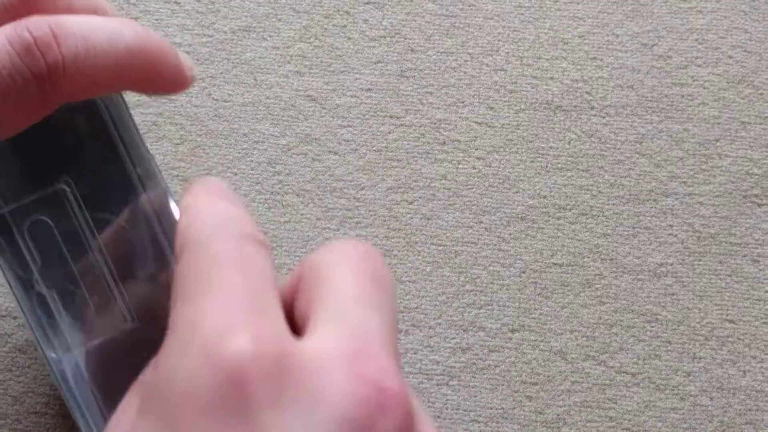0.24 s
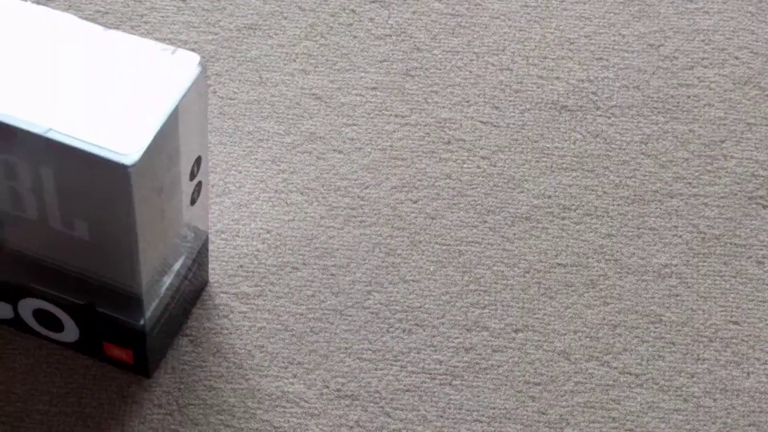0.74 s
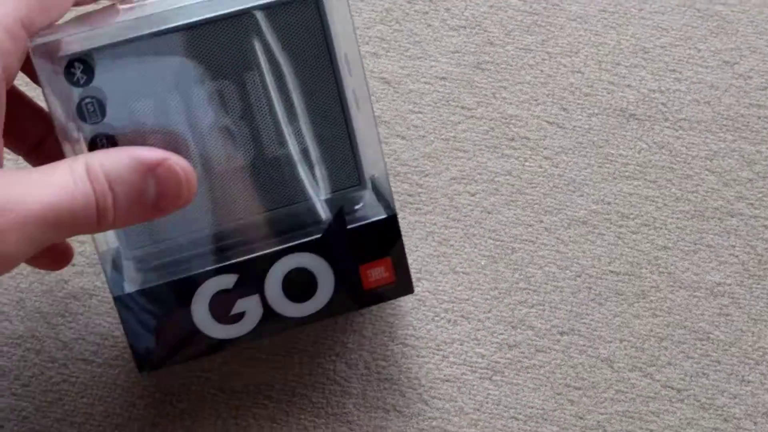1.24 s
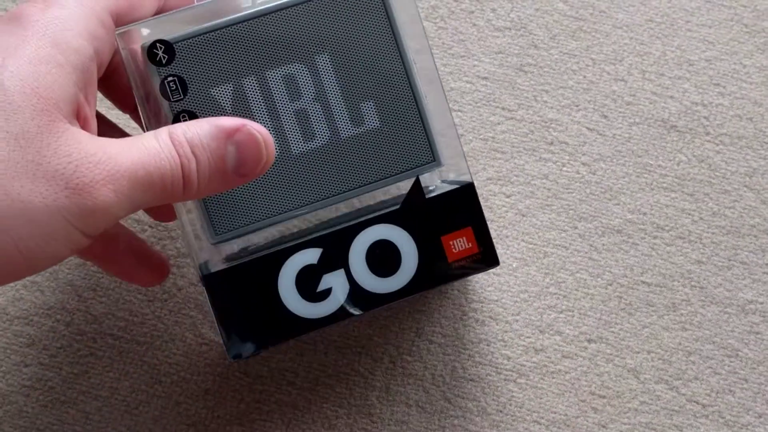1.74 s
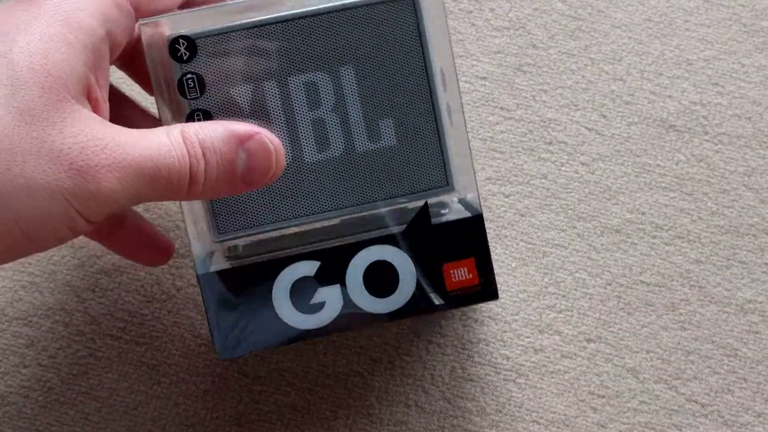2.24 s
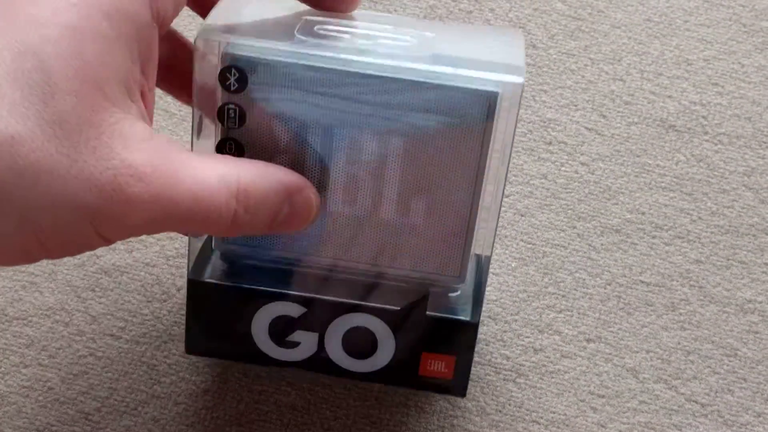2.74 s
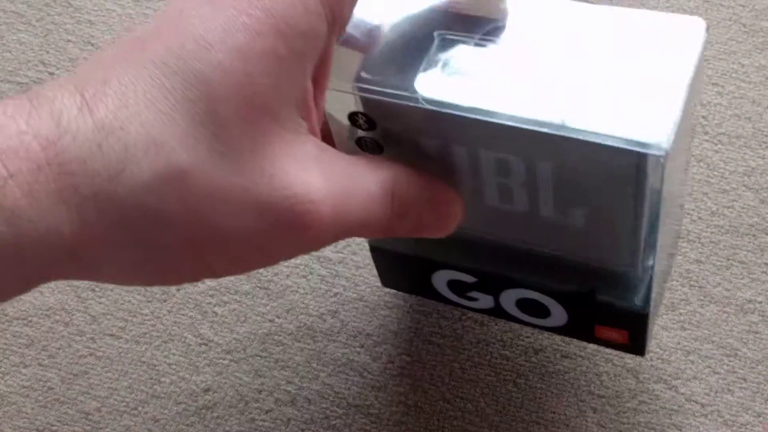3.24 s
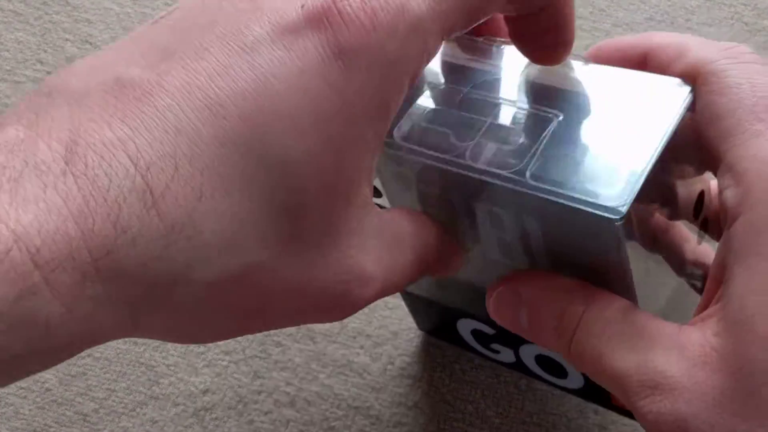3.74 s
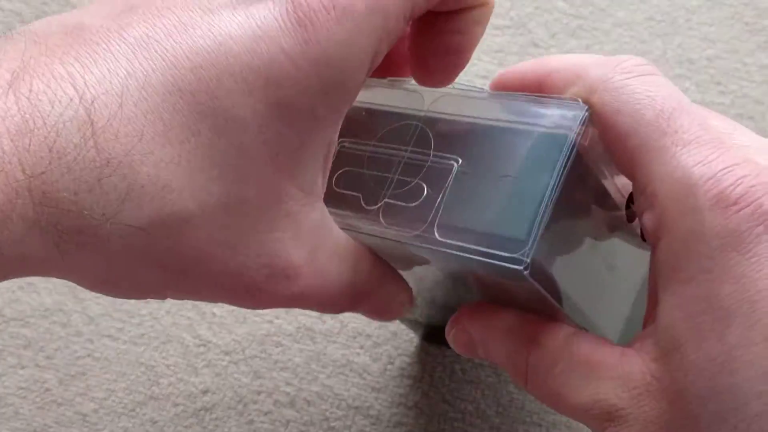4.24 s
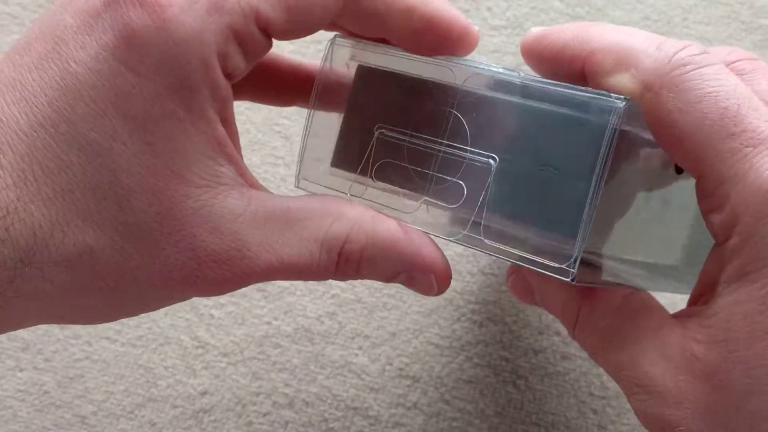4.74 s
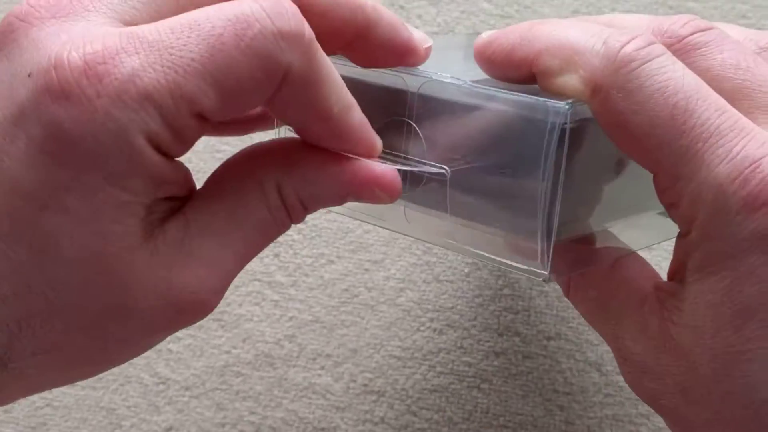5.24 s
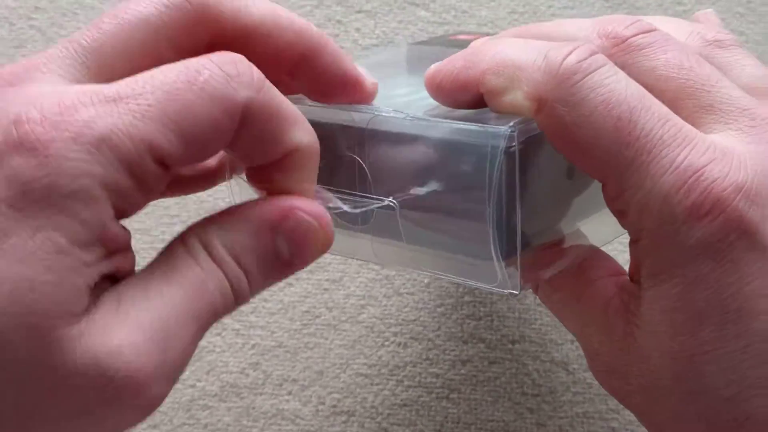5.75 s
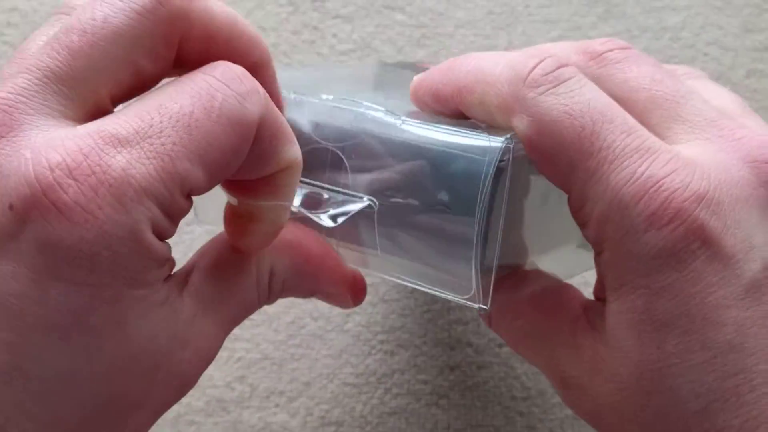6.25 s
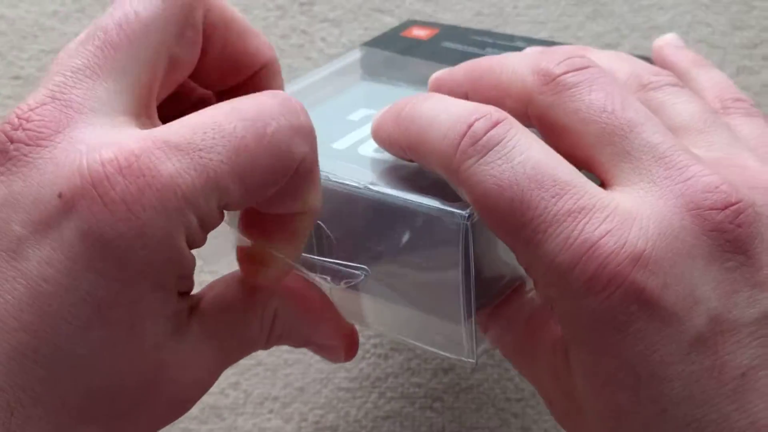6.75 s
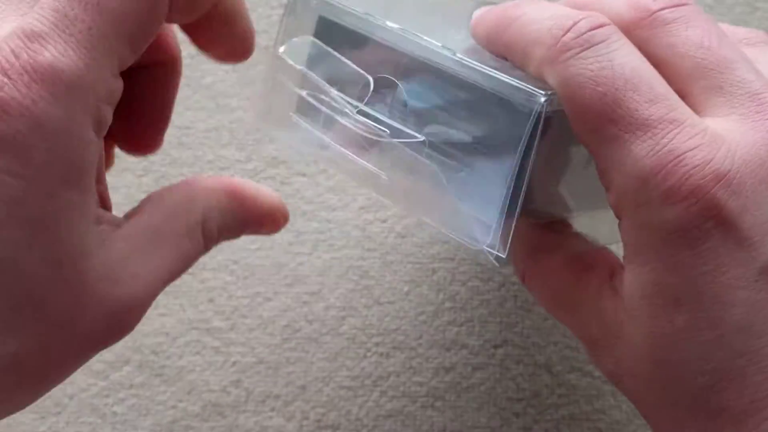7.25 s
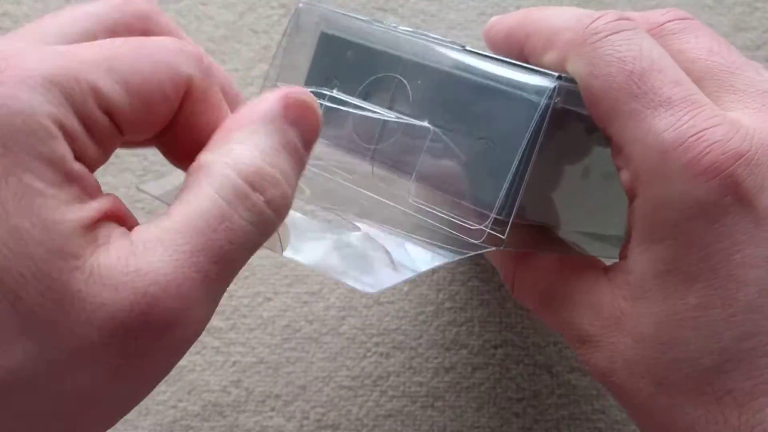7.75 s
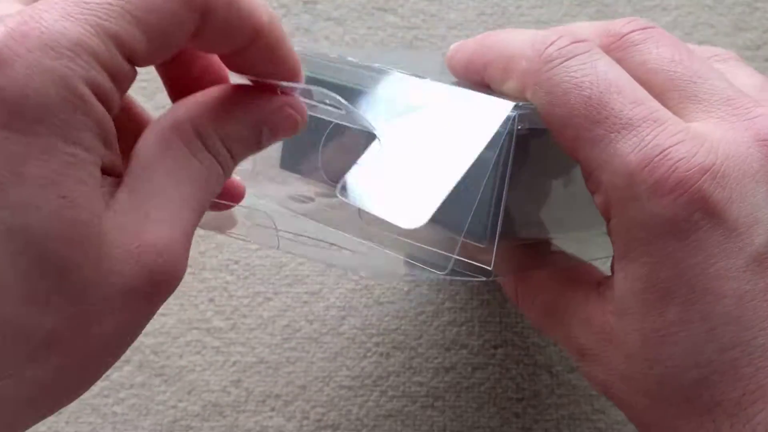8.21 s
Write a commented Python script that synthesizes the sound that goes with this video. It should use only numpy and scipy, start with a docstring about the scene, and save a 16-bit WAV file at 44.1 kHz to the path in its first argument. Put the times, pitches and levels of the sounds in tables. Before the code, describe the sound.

Hands rub, flex and pry open a stiff clear plastic box, with crinkles, small squeaks, hollow knocks and sharp snaps.

```python
"""Fingers tick and rub faintly on a stiff clear plastic box, close to the microphone, over a carpet.
The hands turn it, pick at its tab and pry the lid open, sliding in short strokes that squeak and make
the sheet crinkle. Each snap of the sheet is a bright tick that rings the panels and thumps the hollow
box; knocks ring them more softly. Two seconds in, one hard crack rings round the room; the snaps come
thickest and loudest near seven seconds."""
import sys
import numpy as np
from scipy import signal
from scipy.fft import rfft, irfft, next_fast_len
from scipy.io import wavfile
from scipy.ndimage import map_coordinates

SR = 44100
rng = np.random.default_rng(int(sys.argv[2]) if len(sys.argv) > 2 else 0)


def digitize_waveform(pressure):
    """Quantize a signal to 16-bit integers and store it at the path in sys.argv[1].

    Rows of a 2-D input are taken as channels; values are limited to [-1, 1].
    """
    field = np.atleast_2d(pressure).T
    bounded = np.clip(field, -1, 1)
    quanta = np.round(bounded * 32767).astype(np.int16)
    wavfile.write(sys.argv[1], SR, quanta)


N = 373968
SHOT = 8192  # samples in one short sound
AGE, TIME = np.arange(SHOT) / SR, np.arange(N) / SR
PRY_START_S = 5.2


def amp(db):
    """Decibels to gain."""
    return 10 ** (np.asarray(db) / 20)


def unit_rms(x):
    """Scale to rms 1."""
    return x / np.sqrt(np.mean(x ** 2) + 1e-20)


def unit_blow(x):
    """Scale a short sound to the energy of 10 ms at rms 1."""
    return x * np.sqrt(SR / 100 / (np.sum(x ** 2) + 1e-20))


def along(points, hz):
    """Read (Hz, value) points on a log frequency axis."""
    point_hz, values = np.transpose(points)
    return np.interp(np.log(hz + 1), np.log(point_hz + 1), values)


def filtered(x, response):
    """Pass x through a complex frequency response."""
    size = next_fast_len(len(x) + SHOT)
    return irfft(rfft(x, size) * response(np.fft.rfftfreq(size, 1 / SR)), size)[:len(x)]


def coloured(x, points):
    """Give x a spectrum, at rms 1."""
    return unit_rms(filtered(x, lambda hz: amp(along(points, hz))))


def causal(points):
    """Minimum-phase response of a spectrum: nothing sounds before the blow."""
    cepstrum = irfft(np.log(amp(along(points, np.fft.rfftfreq(SHOT, 1 / SR)))))
    cepstrum[1:SHOT // 2] *= 2
    cepstrum[SHOT // 2 + 1:] = 0
    return np.exp(rfft(cepstrum))


def fade(t60, attack):
    """A quick rise and an exponential decay, both set in seconds."""
    return amp(-60 * AGE / t60) * (1 - np.exp(-AGE / attack))


def burst(colour, t60, attack):
    """A dying puff of noise through a causal colour."""
    puff = rng.standard_normal(SHOT) * fade(t60, attack)
    return unit_blow(irfft(rfft(puff) * colour))


def ring(hz, t60, attack):
    """One damped mode."""
    return unit_blow(np.sin(2 * np.pi * hz * AGE) * fade(t60, attack))


def wobble(rate, size):
    """A smooth random curve, rate knots a second."""
    return map_coordinates(rng.standard_normal(int(size * rate / SR) + 4), [np.arange(size) * rate / SR])


def add(track, start_s, x):
    """Mix x into the track; what falls outside is dropped."""
    start = round(start_s * SR)
    x = x[max(-start, 0):]
    part = track[max(start, 0):][:len(x)]
    part += x[:len(part)]


# The carpeted room around the microphone. Each row: frequency in Hz, t60 in seconds.
ROOM_DECAY = [(150, 0.033), (700, 0.32), (2500, 0.28), (7000, 0.22), (11000, 0.19), (16000, 0.11)]

def room(x, build_s):
    """The room answers x with a diffuse tail that builds up and lasts longest in the midrange."""
    hz, t, noise = signal.stft(rng.standard_normal(2 * SHOT), SR, nperseg=256)
    decay = amp(-60 * t / along(ROOM_DECAY, hz)[:, None])
    tail = signal.istft(noise * decay, SR, nperseg=256)[1]
    tail *= 1 - np.exp(-(np.arange(len(tail)) / SR / build_s) ** 2)
    return signal.fftconvolve(x, tail / np.linalg.norm(tail))


# Low background noise at the microphone. Each row: frequency in Hz, relative level in dB.
RUMBLE_COLOUR = [(15, 0.5), (50, 4.5), (90, 6), (200, -3), (350, -12.5), (900, -26)]

def rumble(activity, ceiling_db=-68.5, knee_db=-70.5):
    """Low background rumble: its level rises with the sounds above it, levels off and sinks in the pauses."""
    gain = amp(ceiling_db) * activity / (activity + amp(knee_db))
    return gain * coloured(rng.standard_normal(N), RUMBLE_COLOUR)


# The whole shell. Each row: resonance in Hz, width in Hz, level in dB relative to the broad response.
SHELL_RESONANCES = [(713, 43, -6.5), (1680, 160, -9), (3830, 20, -13.5), (5320, 160, -11.5),
                    (6100, 110, -10.5), (6810, 290, -6.5), (7500, 70, -10), (8300, 160, -6.5)]

def shell(x):
    """The box lends its resonances to what happens on it."""
    def response(hz):
        return 1 + sum(amp(db) * 1j * hz * width / (centre ** 2 - hz ** 2 + 1j * hz * width)
                       for centre, width, db in SHELL_RESONANCES)
    return filtered(x, response)


# Fingers travel over the plastic. Each row: start and length in seconds, slide and rub strength in dB.
FINGER_STROKES = [(0, 0.087, -80, -70.5), (0.17, 0.054, -72, -70), (0.334, .06, -79.5, -74.5),
                  (0.401, 0.36, -65, -65), (0.814, .3, -65, -63), (0.959, 0.068, -55, -61.5),
                  (1.167, 0.11, -69, -64), (1.381, 0.067, -70, -65), (1.733, 0.036, -63, -68),
                  (1.856, 0.014, -68, -68), (1.954, 1, -71.5, -74.5), (2.15, 0.17, -62, -64.5),
                  (2.602, 0.26, -60.5, -65.5), (2.93, 0.021, -73, -67.5), (3.046, 0.868, -71.5, -72.5),
                  (3.11, 0.25, -63.5, -87), (3.306, 0.13, -74, -65.5), (3.605, 0.13, -68, -58),
                  (3.805, 0.082, -67, -63.5), (3.976, 0.026, -73, -70.5), (4.13, 0.032, -68, -61),
                  (4.21, 0.099, -70.5, -66), (4.38, 0.022, -68, -62.5), (4.457, 0.024, -64, -58),
                  (4.709, 0.019, -74, -63.5), (4.815, 0.023, -73, -66), (4.996, 0.035, -68.5, -64),
                  (5.113, 0.018, -82, -71), (5.21, 0.19, -72, -68), (5.481, 0.011, -67, -76),
                  (5.589, 0.032, -59.5, -55), (5.65, 1.26, -78.5, -65.5), (6.106, 0.018, -55.5, -63),
                  (6.76, 0.032, -53.5, -59.5), (6.993, 0.094, -42, -37), (7.42, .35, -66.5, -63),
                  (7.536, 0.12, -56.5, -65), (8.147, 0.4, -70.5, -65)]

def strokes(attack_s=0.0076, release_t60=0.26):
    """Strength of sliding and of rubbing: each stroke rises, holds and dies away, and their powers add."""
    slide_power = np.full(N, amp(-93) ** 2)  # at rest the hands only hold the box
    rub_power = np.full(N, amp(-86.5) ** 2)
    for start, length, slide_db, rub_db in FINGER_STROKES:
        t = np.arange(int((length + release_t60) * SR)) / SR
        shape = (1 - np.exp(-t / attack_s)) * amp(-60 * np.maximum(t - length, 0) / release_t60)
        add(slide_power, start, (amp(slide_db) * shape) ** 2)
        add(rub_power, start, (amp(rub_db) * shape) ** 2)
    return np.sqrt(slide_power), np.sqrt(rub_power)


def grain(per_s, spread_db):
    """Tiny slips at random moments, with a few much larger than the rest."""
    slipping = rng.random(N) < per_s / SR
    sizes = amp(spread_db * np.clip(rng.standard_normal(N), -2, 2))
    return unit_rms(slipping * sizes * rng.choice([-1, 1], N))


# Close on the fingers: sliding hiss, skin rub, the softer treble of slips, and the hollow box beneath.
# Each row: frequency in Hz, relative level in dB.
SLIDE_COLOUR = [(1000, -27), (2800, -7.5), (4500, -4.5), (6000, -2.5), (7200, 2), (8300, -6), (10000, -10),
                (15500, -15.5)]
RUB_COLOUR = [(120, -9), (280, 5), (520, -0.5), (730, 0), (1150, -3.5), (1700, -5), (2600, -8.5),
              (5000, -17.5)]
FINGERTIP_COLOUR = [(8000, -3), (11000, -5.5), (16000, -10.5)]
BOX_COLOUR = [(40, -21), (100, -15.5), (170, 1.5), (300, -3), (480, -2), (900, -35.5)]

def friction(sliding, rubbing):
    """Skin and sheet slide in fine grains; prying is grittier and makes the walls groan."""
    prying = TIME > PRY_START_S
    grit = np.where(prying, 0.58, 0.3)
    slips = grit * coloured(grain(per_s=340, spread_db=7), FINGERTIP_COLOUR)
    hiss = sliding * amp(-2 + 0.8 * wobble(33, N))
    hiss *= coloured(rng.standard_normal(N) + slips, SLIDE_COLOUR)
    rub = rubbing * amp(-4.5 + 2 * wobble(40, N))
    rub *= coloured(rng.standard_normal(N) + slips, RUB_COLOUR)
    groan = prying * rubbing * amp(-9.5 + 0.83 * wobble(28, N))
    groan *= coloured(rng.standard_normal(N), BOX_COLOUR)
    return hiss + rub + groan


# The box is jolted in the hands. Each row: start in seconds, level in dB, pitch in Hz.
JOLTS = [(3.444, -53.5, 71), (6.26, -57, 165), (6.997, -45.5, 90.7), (8.242, -52, 129)]

def bumps():
    """Dull, heavily damped thuds of the whole box."""
    out = np.zeros(N)
    for start, db, hz in JOLTS:
        add(out, start, amp(db) * ring(hz, t60=0.12, attack=0.0048))
    return out


# The sheet's tick and the panels' clatter, close up. Each row: frequency in Hz, relative level in dB.
TICK_COLOUR = [(1200, -34), (2400, -12.5), (3600, -2), (4500, -3.5), (5300, 0), (7400, 3), (8400, -4),
               (9500, -8.5), (12000, -13.5), (16000, -18)]
PANEL_COLOUR = [(250, -32.5), (560, -7.5), (800, -6), (1150, -8), (1650, -5.5), (2100, -5.5), (2600, -4.5),
                (4000, -25.5)]
# The clearest dry ticks of the flexing sheet. Each row: start in seconds, level in dB.
CLEAR_CRINKLES = [(0.4603, -57), (0.7112, -59.5), (0.873, -65), (1.547, -76), (1.7801, -72), (1.866, -67),
                  (3.863, -64), (4.1618, -61), (4.3853, -61), (4.714, -69), (5.3138, -58.5), (5.6415, -57),
                  (5.725, -61), (5.945, -62), (6.004, -61.5), (6.031, -67), (6.368, -59), (6.4928, -57),
                  (6.658, -53.5), (7.481, -60.5), (7.6715, -54), (7.724, -54)]

def crinkles(rubbing):
    """Slips too small to stir the box: a tick and some panel. More come at random as the fingers press."""
    out = np.zeros(N)
    colour = causal(TICK_COLOUR) + amp(6) * causal(PANEL_COLOUR)
    per_s = np.where(TIME < PRY_START_S, 1.5, 7)
    moments = np.flatnonzero(rng.random(N) < per_s / SR)
    # the random ones lie about 1 dB under the rubbing strength, scattered by 5 dB
    faint = [(i / SR, 20 * np.log10(rubbing[i]) - 1 - 5 * rng.standard_normal()) for i in moments]
    for start, db in CLEAR_CRINKLES + faint:
        add(out, start, amp(db) * burst(colour, t60=0.012, attack=0.00015))
    return out


# A fingertip catches. Each row: start and length in seconds, first and last pitch in Hz, level in dB.
FINGER_SQUEAKS = [(0.983, 0.025, 1572, 1440, -40.5), (0.99, 0.02, 1510, 1140, -52),
                  (1.003, 0.038, 1040, 1066, -52), (5.016, 0.015, 1440, 1360, -52.5),
                  (5.018, 0.027, 895, 724, -54.5), (6.122, 0.028, 693, 700, -49.5),
                  (6.141, 0.028, 729, 650, -49)]

def squeaks():
    """Skin sticks and slips: short, rough tones, mostly falling, with a little room behind them."""
    out = np.zeros(N)
    for start, length, first_hz, last_hz, db in FINGER_SQUEAKS:
        size = int(length * SR)
        hz = np.linspace(first_hz, last_hz, size) * (1 + 0.079 * wobble(530, size))
        grip = np.hanning(size) * amp(wobble(524, size))
        add(out, start, amp(db) * grip * np.sin(2 * np.pi * np.cumsum(hz) / SR))
    return out + amp(-13.5) * room(out, build_s=0.0034)[:N]


def tick(colour, t60, crease_hz=6100, spread_octaves=0.25):
    """A bright puff and the brief ping of the crease that made it, each time at a new pitch."""
    hz = crease_hz * 2 ** (spread_octaves * np.clip(rng.standard_normal(), -2, 2))
    puff = burst(colour, t60, attack=0.00018)
    return unit_blow(puff + amp(-9) * ring(hz, t60=0.03, attack=0.00017))


def modes(table, centre_hz, attack, scatter_db=6, focus_db_per_octave=17.5):
    """Modes far from centre_hz answer less; each blow lands on another spot and shifts their balance."""
    offsets_db = scatter_db * rng.standard_normal(len(table))
    signs = rng.choice([-1, 1], len(table))
    out = np.zeros(SHOT)
    for (hz, db, t60), offset_db, sign in zip(table, offsets_db, signs):
        loss_db = focus_db_per_octave * abs(np.log2(hz / centre_hz))
        out += sign * amp(db + offset_db - loss_db) * ring(hz, t60, attack)
    return unit_blow(out)


# The flat panels and the hollow box. Each row: mode frequency in Hz, relative level in dB, t60 in seconds.
FLAT_PANEL_MODES = [(736.4, -1, 0.052), (879, -12.5, 0.08), (959, -4.5, 0.061), (1458, 1, 0.044),
                    (1710, -4, 0.043), (1883, -2, .05), (2343, -9, 0.033), (2680, 0, .05)]
HOLLOW_BOX_MODES = [(185, -0.5, 0.09), (249.3, 0, 0.1), (325, 0, 0.054), (425, -0.5, 0.039)]

def strike(colours, levels_db, tick_t60, panel_hz, ring_db):
    """One blow, SHOT samples in: it ticks, rings the panels and, more slowly, the hollow box."""
    out = np.zeros(5 * SHOT)
    onset = SHOT / SR
    tick_colour, panel_colour, box_colour = colours
    tick_gain, panel_gain, box_gain = amp(levels_db)
    panel_ring = amp(ring_db) * modes(FLAT_PANEL_MODES, panel_hz, attack=0.00035)
    clatter = burst(panel_colour, tick_t60 + 0.015, attack=0.00039)
    thump = burst(box_colour, t60=0.21, attack=0.0012)
    box_ring = amp(3) * modes(HOLLOW_BOX_MODES, centre_hz=272, attack=0.0036)
    body = panel_gain * unit_blow(clatter + panel_ring) + box_gain * unit_blow(thump + box_ring)
    add(out, onset, tick_gain * tick(tick_colour, tick_t60) + body)
    # the room hears all sides of the box at once: the broad colours and the ring of the panels
    tick_wave, panel_wave, box_wave = (unit_blow(irfft(colour)) for colour in colours)
    panel_wave = unit_blow(panel_wave + amp(-3.5) * panel_ring)
    radiated = tick_gain * tick_wave + panel_gain * panel_wave + box_gain * box_wave
    add(out, onset, amp(-10.5) * room(radiated, build_s=0.0051))
    # a faint, bright hiss swells for a few milliseconds just before the tick
    swell = burst(tick_colour, t60=0.0096, attack=0.0002)[::-1]
    add(out, 0, amp(-21.5) * tick_gain * swell)
    return out


# A soft contact stirs less of the panels' treble. Each row: frequency in Hz, gain in dB.
KNOCK_SOFTENING = [(1400, 2), (2600, -5), (5000, -13)]
# Knocks close to the microphone. Each row: start in seconds, panel level in dB,
# frequency in Hz where the panels ring most, hollow box level in dB.
PANEL_KNOCKS = [(.219, -59.5, 730, -62.5), (0.8204, -62, 875, -61.5), (2.5908, -51.5, 730, -63),
                (3.4403, -50, 730, -53.5), (3.459, -54, 730, -53.5), (3.66, -54, 860, -73),
                (4.0203, -63, 730, -62), (4.438, -47.5, 780, -74), (5.1955, -59.5, 1460, -68),
                (5.2284, -62, 1700, -70), (5.4093, -62.5, 1750, -64), (5.4956, -63, 730, -69),
                (6.2249, -57, 730, -60), (6.3414, -57.5, 730, -57.5), (6.3945, -46.5, 730, -42),
                (6.4394, -61, 730, -59), (6.8507, -47, 730, -62), (7.8834, -37, 905, -36),
                (8.243, -53.5, 1470, -47.5), (8.404, -41.5, 1560, -59)]

def knocks():
    """A finger or the flap knocks on a panel: a hollow ring with a lighter tick."""
    out = np.zeros(N)
    colours = causal(TICK_COLOUR), causal(PANEL_COLOUR) * causal(KNOCK_SOFTENING), causal(BOX_COLOUR)
    for start, panel_db, panel_hz, box_db in PANEL_KNOCKS:
        tick_db = panel_db - 1.5
        knock = strike(colours, [tick_db, panel_db, box_db], 0.027, panel_hz, ring_db=-0.5)
        add(out, start - SHOT / SR, knock)
    return out


# The crack as it reaches the microphone directly. Each row: frequency in Hz, relative level in dB.
DIRECT_CRACK_COLOUR = [(150, -27.5), (1100, -32), (2000, -25), (3300, -14), (4000, -5), (4900, 3),
                       (5600, -0.5), (6800, -2), (8200, -6.5), (9500, -11), (15500, -18.5)]
# Nearby surfaces return it. Each row: delay in seconds, level in dB relative to the direct sound.
NEAR_ECHOES = [(.0042, -12.5), (.0067, -14), (0.0106, -22), (0.0131, -12), (.0157, -15)]
# A small give, then the break. Each row: start in seconds, level in dB, t60 in seconds.
CRACK_STAGES = [(2.046, -25.5, 0.0072), (2.0462, -22.5, 0.0094)]

def crack():
    """A stiff crease lets go at once; near surfaces and then the room answer."""
    direct, reflected = np.zeros(N), np.zeros(N)
    colour = causal(DIRECT_CRACK_COLOUR)
    # the crack's room tail dips near 4.6 kHz and is brighter near 6.5 kHz: Hz, dB
    tail_colour = causal([(1200, 2), (2900, 0.5), (4600, -3), (6500, 3), (14000, 0)])
    radiated = unit_blow(irfft(colour * tail_colour))
    for start, db, t60 in CRACK_STAGES:
        add(direct, start, amp(db) * burst(colour, t60, attack=0.0001))
        add(reflected, start, amp(db - 10.5) * room(radiated, build_s=0.03))
    for delay, db in NEAR_ECHOES:
        add(reflected, delay, amp(db) * direct)
    return direct + reflected


# Snaps close to the microphone. Each row: start in seconds, tick level in dB, tick t60 in seconds,
# frequency in Hz where the panels ring most, hollow box level in dB.
SHEET_SNAPS = [(0.0449, -53.5, 0.032, 2040, -68), (2.936, -51.5, 0.0041, 1720, -66),
               (3.6462, -34.5, 0.025, 730, -58), (3.9433, -43, .021, 2330, -52),
               (3.952, -45, 0.004, 2300, -70), (4.005, -53, 0.023, 730, -68),
               (4.1196, -56.5, 0.023, 820, -74), (4.4346, -43, 0.015, 850, -75),
               (5.3656, -57, 0.039, 730, -83), (5.6079, -44.5, 0.022, 730, -52.5),
               (5.756, -47.5, 0.027, 1700, -54.5), (5.7889, -32.5, 0.0078, 1460, -48.5),
               (6.0647, -47.5, .026, 730, -60), (6.2616, -43.5, 0.026, 1680, -56.5),
               (6.3822, -54, 0.014, 730, -75), (6.4761, -49.5, 0.01, 1460, -60),
               (6.533, -39, 0.029, 730, -57), (6.5387, -37.5, 0.03, 730, -40.5),
               (6.6447, -43, 0.011, 1690, -56.5), (6.7145, -32.5, 0.013, 1700, -49),
               (6.819, -39, 0.017, 1700, -54.5), (6.859, -44.5, 0.014, 730, -46),
               (6.9519, -25.5, 0.015, 1430, -50), (6.9843, -26.5, .05, 730, -37.5),
               (6.9969, -18, 0.022, 730, -36.5), (7.009, -24, .022, 720, -42.5),
               (7.0213, -26.5, 0.042, 724, -42), (7.0969, -31.5, 0.0063, 1590, -42),
               (7.1207, -36, 0.036, 870, -50.5), (7.2826, -37, 0.015, 1910, -48),
               (7.2866, -34, 0.016, 1700, -44.5), (7.3073, -32, 0.061, 1710, -44),
               (7.335, -39, 0.073, 735, -47.5), (7.6157, -50.5, 0.1, 730, -63),
               (7.7574, -53.5, 0.013, 720, -78), (7.9855, -50.5, 0.13, 960, -56),
               (8.0252, -33.5, .052, 1350, -48.5), (8.036, -40, 0.147, 860, -44.5),
               (8.0476, -40, 0.0089, 730, -44.5), (8.1919, -47.5, 0.18, 2330, -60),
               (8.2055, -46, 0.055, 2330, -57.5), (8.4029, -35.5, 0.05, 1490, -45)]

def snaps(firm_tick_db=-40):
    """The sheet buckles or an edge slips: the harder the snap, the more its tick outweighs the panels."""
    out = np.zeros(N)
    colours = causal(TICK_COLOUR), causal(PANEL_COLOUR), causal(BOX_COLOUR)
    for start, tick_db, t60, panel_hz, box_db in SHEET_SNAPS:
        panel_db = firm_tick_db - 7.5 + 0.88 * (tick_db - firm_tick_db)
        snap = strike(colours, [tick_db, panel_db, box_db], t60, panel_hz, ring_db=-3)
        add(out, start - SHOT / SR, snap)
    return out


def scene():
    """All that the hands do to the box, over a low background rumble, at one close microphone."""
    sliding, rubbing = strokes()
    accents = crack() + squeaks() + bumps()
    blows = snaps() + knocks()
    texture = friction(sliding, rubbing) + rumble(sliding + rubbing) + crinkles(rubbing)
    return (shell(blows + texture) + accents)[None]


def record(dry):
    """The mono recorder keeps nothing above its band limit."""
    top_hz = 15900
    return filtered(dry[0], lambda hz: 1 / np.sqrt(1 + (hz / top_hz) ** 160))[None]


dry = scene()
out = record(dry)
digitize_waveform(out)
```